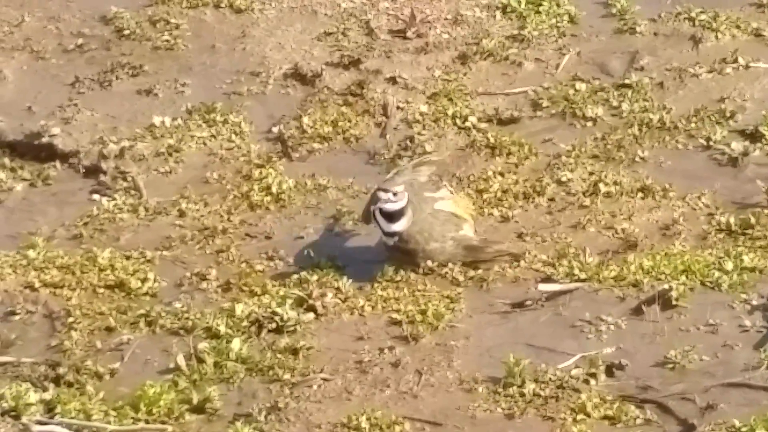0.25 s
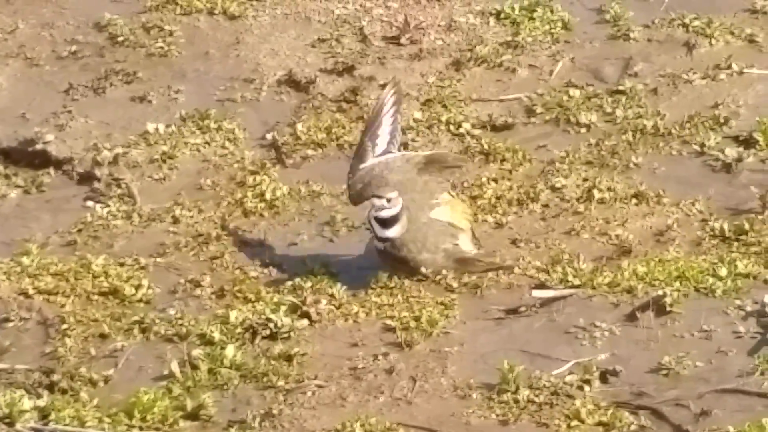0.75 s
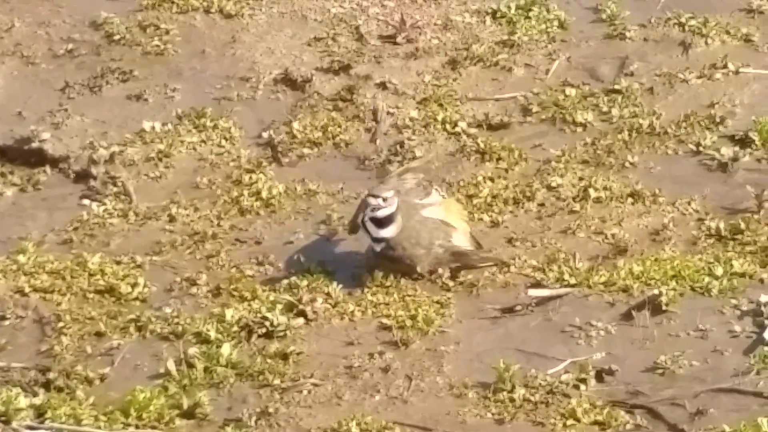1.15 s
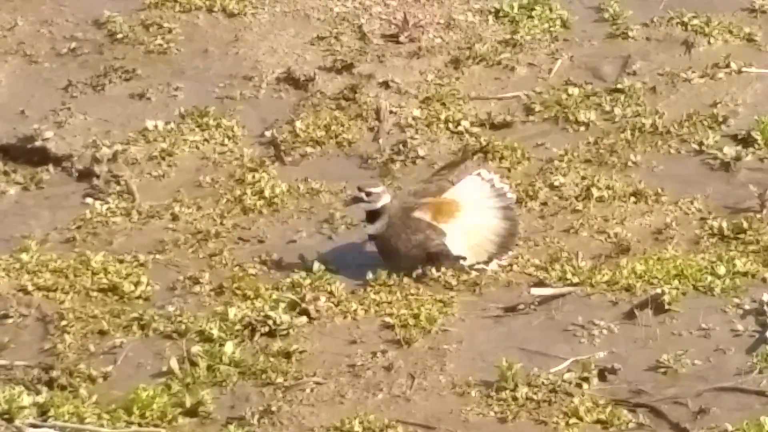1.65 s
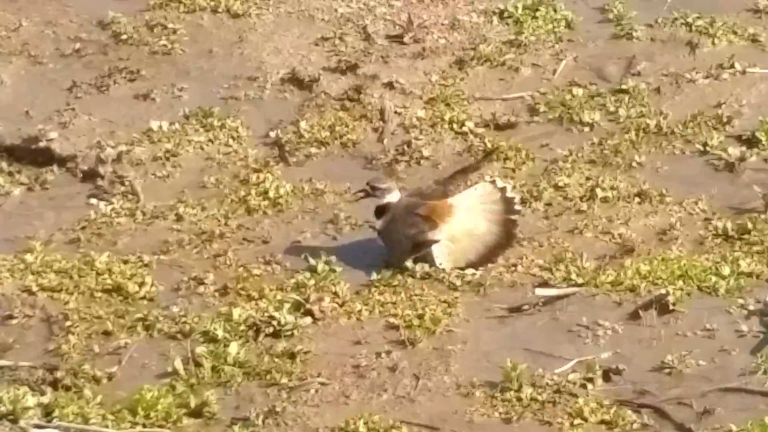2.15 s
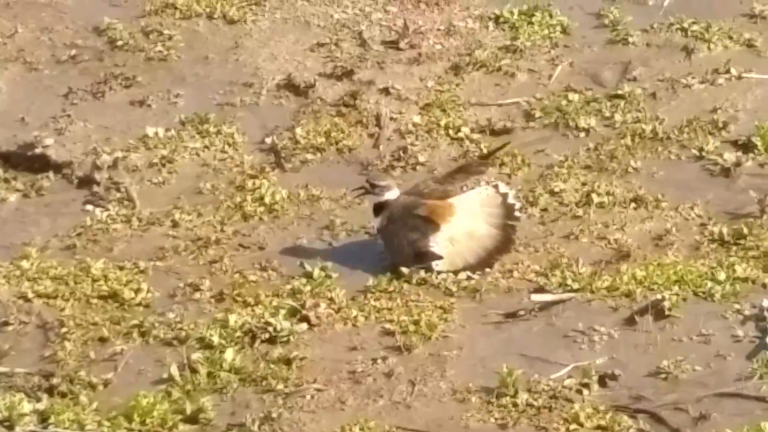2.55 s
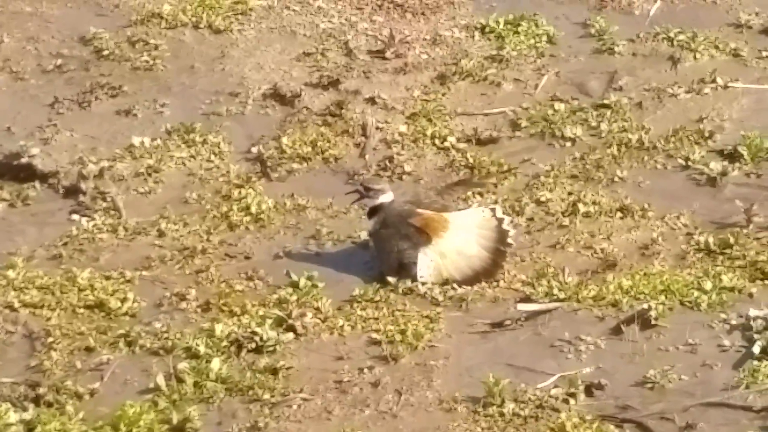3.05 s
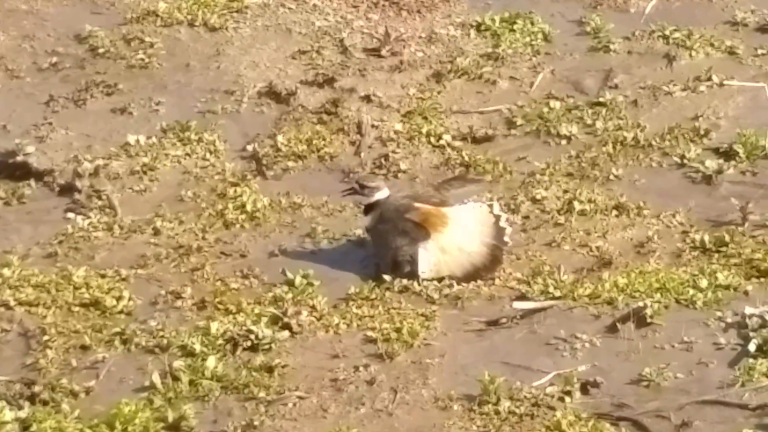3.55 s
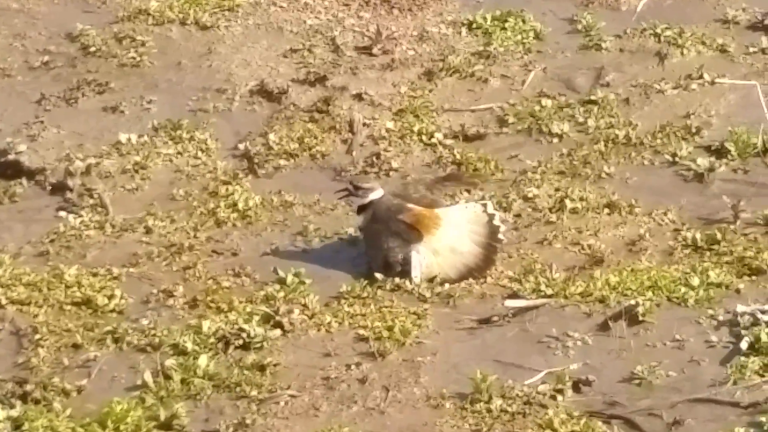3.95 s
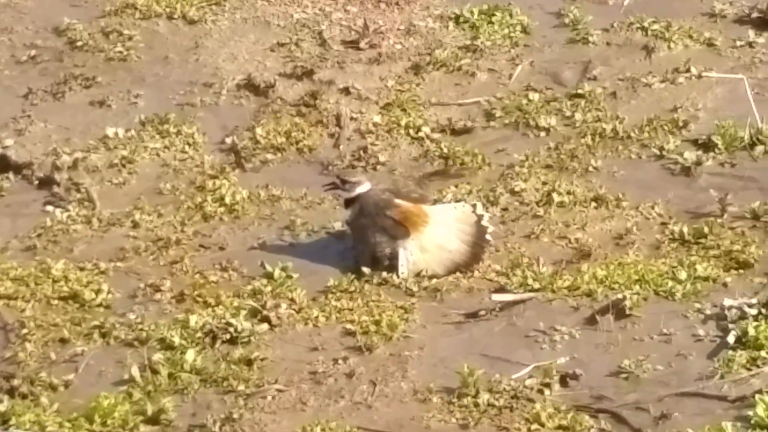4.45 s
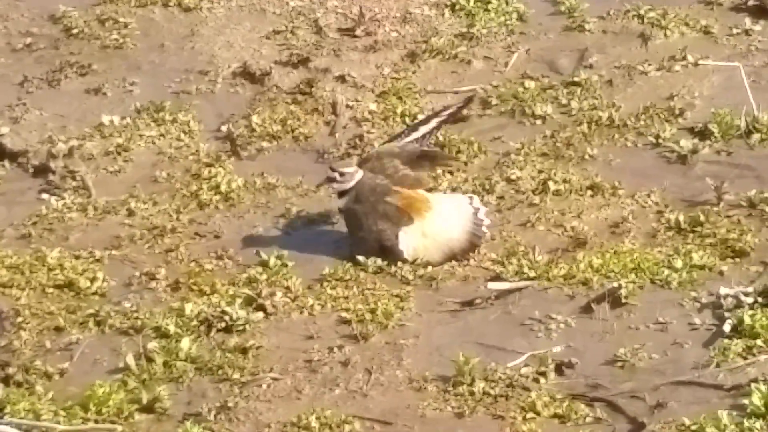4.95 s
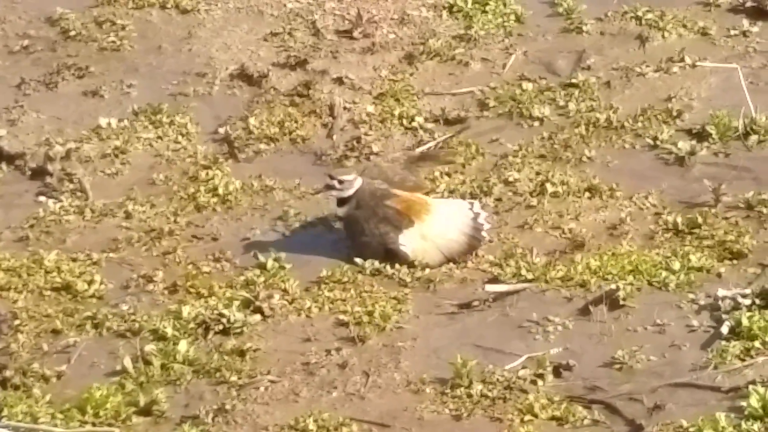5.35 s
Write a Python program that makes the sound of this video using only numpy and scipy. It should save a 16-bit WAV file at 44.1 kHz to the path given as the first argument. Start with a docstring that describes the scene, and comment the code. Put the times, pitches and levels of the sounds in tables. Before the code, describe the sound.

A killdeer gives rising shrill whistles, breaks into a fast, ticking, buzzy trill, then ends on a long upward cry over low wind rumble.

```python
"""Killdeer on a windy mud flat

Rising whistles break into a rapid ticking, hissy trill and end on a long upslur; one faint hoot is far off.
The bird is a sum of partials: a strong second one, joined by odd ones as the period doubles.
The ground adds a short faint tail of scattered echoes; far country air is softly filtered noise.
Wind is shaped noise on two microphone ports, mostly the right one, and freshens towards the end."""
import sys
import numpy as np
from scipy import signal
from scipy.fft import rfft, irfft, next_fast_len
from scipy.io import wavfile
from scipy.ndimage import uniform_filter1d

SR = 44100
rng = np.random.default_rng(int(sys.argv[2]) if len(sys.argv) > 2 else 0)


def bounce(signal):
    """Save signal as a 16-bit WAV file at the path given by the first command-line argument."""
    frames = np.transpose(np.atleast_2d(signal))
    limited = np.clip(frames, -1, 1)
    pcm = np.round(limited * 32767).astype(np.int16)
    wavfile.write(sys.argv[1], SR, pcm)


N = 247401
TIME = np.arange(N) / SR

# Trill notes. Each row: start in seconds, lowest partial's mid-note pitch in Hz, relative level in dB,
# hiss relative to the note in dB.
TRILL_NOTES = [(2.1302, 1962, -26, -47), (2.2167, 1954, -28.5, -45), (2.2862, 1917, -27.5, -42.5),
               (2.3559, 1896, -26, -30), (2.4204, 1925, -26, -41), (2.485, 1895, -26, -38),
               (2.5457, 1944, -26, -33.5), (2.6044, 1915, -25.5, -30.5), (2.66, 1930, -25.5, -33),
               (2.7168, 1954, -24.5, -42), (2.7717, 1944, -26, -28.5), (2.8279, 1893, -23.5, -35),
               (2.8817, 1876, -25, -32), (2.9385, 1849, -25.5, -50.5), (2.9933, 1873, -24.5, -36.5),
               (3.0482, 1888, -25, -29), (3.1022, 1890, -25.5, -26), (3.1549, 1897, -25.5, -23),
               (3.2065, 1910, -24, -28), (3.2589, 1922, -24.5, -25), (3.3114, 1919, -25, -26),
               (3.368, 1928, -25.5, -23), (3.422, 1890, -24, -26.5), (3.4788, 1870, -26, -49.5),
               (3.5293, 1894, -24.5, -42.5), (3.582, 1914, -23.5, -27), (3.638, 1840, -25.5, -45.5),
               (3.6915, 1895, -24.5, -35), (3.745, 1874, -24.5, -27), (3.7946, 1920, -26, -28),
               (3.8514, 1874, -26.5, -38.5), (3.9014, 1907, -25.5, -30), (3.9538, 1900, -23.5, -31),
               (4.0027, 1919, -25, -32), (4.0597, 1902, -26.5, -26), (4.1126, 1930, -26, -30),
               (4.1711, 1850, -26.5, -28), (4.2249, 1864, -29, -33), (4.282, 1835, -28, -40.5),
               (4.338, 1840, -28.5, -35), (4.4107, 1834, -30.5, -43.5), (4.5016, 1871, -33.5, -46)]


def gain_of(db):
    """Decibels to amplitude."""
    return 10 ** (np.asarray(db) / 20)


def evened(x):
    """Scales to rms 1."""
    return x / np.sqrt(np.mean(x ** 2) + 1e-20)


def read(points, hz):
    """Interpolates a spectrum on a log-frequency axis."""
    point_hz, value = np.transpose(points)
    return np.interp(np.log(hz + 1), np.log(point_hz + 1), value)


def coloured(x, points):
    """Filters by a spectrum in dB, with zero phase."""
    size = next_fast_len(x.shape[-1] + 4096)
    gain = gain_of(read(points, np.fft.rfftfreq(size, 1 / SR)))
    return irfft(rfft(x, size) * gain, size)[..., :x.shape[-1]]


def wander(size, rate_hz):
    """Gaussian-lowpassed noise: smooth chance, rms near 1, mostly slower than rate_hz."""
    count = next_fast_len(size + 8192)
    hz = np.fft.rfftfreq(count, 1 / SR)
    spectrum = rfft(rng.standard_normal(count)) * np.exp(-(hz / rate_hz) ** 2)
    return evened(irfft(spectrum, count))[:size]


def noise(points):
    """Noise of rms 1 with the given spectrum."""
    return evened(coloured(rng.standard_normal(N), points))


def add(mix, s, sound):
    """Mixes a sound in at time s."""
    part = mix[max(round(s * SR), 0):][:len(sound)]
    part += sound[:len(part)]


def buffet(db, lumps_db=2.5, lumps_hz=30, crackle_db=6.0, crackle_hz=110, brisk_db=-19, brighten=0.81):
    """Turbulence on one port: the harder it blows, the more of it is small, uneven eddies."""
    # Slow broad turbulence, then small fast eddies. Each row: frequency in Hz, relative density in dB per Hz.
    rumble_colour = [(12, 6), (25, -46), (50, -3.5), (95, 3), (160, -0.5), (250, -9), (400, -31),
                     (800, -29.5), (2000, -91), (5000, -92.5)]
    flutter_colour = [(30, -22.5), (120, -3.5), (280, 4.5), (480, -4), (750, -15.5), (1250, -29),
                      (1800, -34), (3000, -55.5), (8000, -79)]
    fast = np.clip(gain_of(brighten * (db - brisk_db) - 2.0), 0, .92)
    rumble = evened(noise(rumble_colour) * gain_of(lumps_db * wander(N, lumps_hz)))
    flutter = evened(noise(flutter_colour) * gain_of(crackle_db * wander(N, crackle_hz)))
    flow = np.sqrt(1 - fast ** 2) * rumble + fast * flutter
    running_rms = np.sqrt(uniform_filter1d(flow ** 2, size=3000) + 1e-9)
    return gain_of(db) * flow / running_rms


def wind(left_db=-1.5, right_db=-1.0, swell_db=1.5, swell_hz=7):
    """Gusts add power to a breeze that freshens; each port has its own turbulence."""
    # Steady breeze. Each row: time in seconds, left and right relative level in dB.
    breeze = [(0, -47, -33), (.55, -63, -37.5), (1.3, -76, -38.5), (2.2, -68.5, -36), (2.6, -61, -27.5),
              (3, -54, -35.5), (3.3, -53, -34.5), (3.55, -62, -37.5), (3.8, -33, -30.5), (4.05, -40, -34.5),
              (4.22, -60.5, -36), (4.45, -41, -32.5), (4.65, -37.5, -26), (4.85, -22, -23.5),
              (4.95, -27.5, -25), (5.1, -21.5, -23), (5.28, -49, -23.5), (5.6, -18, -22.5)]
    # Gusts. Each row: centre in seconds, width in seconds, left and right relative level in dB.
    gusts = [(.1, 0.0245, -44, -38), (.82, 0.072, -44, -33.5), (1.74, 0.052, -28.5, -54),
             (1.901, 0.11, -44, -28), (3.1, 0.034, -48, -28.5), (3.35, 0.017, -30.5, -27),
             (3.898, 0.019, -25.5, -38.5), (4.07, 0.053, -43, -31), (5.17, 0.088, -25, -21),
             (5.38, 0.051, -20.5, -21.5)]
    s, *ports = np.transpose(breeze)
    breeze_db = [np.interp(TIME, s, db) + swell_db * wander(N, swell_hz) for db in ports]
    power = gain_of(breeze_db) ** 2
    for at, width, *db in gusts:
        bell = np.exp(-np.minimum(((TIME - at) / width) ** 2, 30))
        power = power + gain_of(db)[:, None] ** 2 * bell
    left, right = 10 * np.log10(power)
    return np.array([buffet(left + left_db), buffet(right + right_db)])


def air(shared=0.089):
    """Distant air: a soft filtered-noise hiss, partly the same at both ports."""
    # Each row: frequency in Hz, relative density in dB per Hz.
    air_colour = [(20, 12.5), (100, 15.5), (330, 6), (850, 0), (1900, -8), (2600, -12), (4000, -22),
                  (5500, -24.5), (8000, -32.5), (10000, -30.5), (13000, -25.5), (16000, -30)]
    # Level before a slow drift. Each row: time in seconds, level in dB.
    air_level = [(0, -49.5), (1.3, -47), (2.5, -48.5), (4, -48.5), (5.6, -47)]
    same = np.clip(shared, 0, 1)
    separate = np.array([noise(air_colour), noise(air_colour)])
    hiss = np.sqrt(same) * noise(air_colour) + np.sqrt(1 - same) * separate
    return hiss * gain_of(np.interp(TIME, *np.transpose(air_level)) + 0.9 * wander(N, 2.6))


def eddies(level_db=-0.95, left_db=-24, weak_db=-30, weak_width_s=0.012, count=8):
    """Single eddies swell and pass the right port within hundredths of a second; weak ones come at random."""
    # Strongest eddies. Each row: centre in seconds, width in seconds, relative level in dB.
    strong = [(.104, 0.0069, -24), (1.173, 0.0083, -28), (1.336, 0.0088, -23), (1.411, 0.00387, -20),
              (1.506, 0.011, -20.5), (1.766, 0.0087, -24), (1.886, 0.01376, -16), (1.917, 0.019, -18.5),
              (1.99, 0.009, -21.5), (2.188, 0.0077, -14), (2.202, 0.0038, -11.5), (2.24, 0.022, -21),
              (2.547, 0.0098, -13), (2.594, 0.0035, -16.5), (2.618, 0.0089, -19), (2.7, 0.0074, -18),
              (2.755, 0.011, -15.5), (3.261, 0.0035, -21), (3.353, 0.0202, -22), (3.8, 0.008, -20),
              (3.834, 0.022, -21.5), (4.515, 0.0076, -21), (4.713, 0.014, -18), (4.932, 0.0067, -19.5),
              (5.175, 0.0018, -10), (5.197, .0045, -12.5)]
    # Spectrum of one eddy. Each row: multiple of its upper reach, relative density in dB per Hz.
    eddy_colour = [(.05, -21), (.25, -0.5), (.6, -2), (1, -6.5), (1.7, -15), (3, -38.5), (7, -63),
                   (20, -89)]
    # upper reach of an eddy of this width and level; shorter and stronger ones reach higher
    usual_reach_hz, usual_width_s, usual_db = 278, 0.012, -18
    width_power, growth_per_db = 0.05, 0.0968
    t, out = np.arange(-4096, 4096) / SR, np.zeros(N)
    weak = [(s, weak_width_s, weak_db) for s in rng.uniform(-t[0], N / SR, count)]
    for s, width, db in strong + weak:
        reach_hz = usual_reach_hz * (usual_width_s / width) ** width_power
        reach_hz *= np.exp(growth_per_db * (db - usual_db))
        window = np.exp(-np.minimum((t / width) ** 2, 30))
        colour = [(k * reach_hz, d) for k, d in eddy_colour]
        puff = coloured(rng.standard_normal(len(t)) * window, colour)
        puff *= np.sqrt(np.sum(window ** 2) / np.sum(puff ** 2))
        add(out, s + t[0], gain_of(db + level_db) * puff)
    return np.array([gain_of(left_db) * out, out])


def syrinx(t, hz, db, lowest_db, odd_db, bright_db, rasp, snap_hz, odd_delay_s, jitter, snap_s=0.00077,
           slip=0.97, slip_hz=380, odd_flicker_db=2.59, attack_s=0.0012, release_s=0.0096):
    """The second partial starts with a snap; a moment later the period doubles and the odd partials join."""
    # Weaker odd partials, relative to the second. Each row: frequency in Hz, relative level in dB.
    odd_colour = [(1900, -14), (5500, -14), (5950, -21.5), (8800, -21.5), (9300, -19.5), (9900, -40),
                  (12500, -33.5), (13300, -29), (15000, -35.5)]
    # Even partials. Each row: frequency in Hz, relative level in dB.
    even_colour = [(3400, -1), (4400, 1.5), (7100, -21), (8000, -15), (11000, -42), (12100, -27.5),
                   (14500, -30.5), (15600, -39)]
    hz = (hz + snap_hz * np.exp(-t / snap_s)) * (1 + jitter * wander(len(t), 970))
    phase = 2 * np.pi * np.cumsum(hz) / SR
    onset = (1 + np.tanh((t - odd_delay_s) / 0.00033)) / 2
    doubling = gain_of(odd_flicker_db * wander(len(t), 170)) * onset
    slipping = slip * rasp * wander(len(t), slip_hz)  # unsteady doubling smears the upper odd partials
    tone = gain_of(read(even_colour, 2 * hz)) * np.sin(2 * phase)
    tone += doubling * gain_of(read(odd_colour, hz) + lowest_db) * np.sin(phase)
    for k in (3, 5, 7):
        tone += doubling * gain_of(read(odd_colour, k * hz) + odd_db) * np.sin(k * phase + slipping)
    for k in (4, 6, 8):
        partial_db = read(even_colour, k * hz) + bright_db * (k / 2 - 1) ** 0.7
        tone += gain_of(partial_db) * np.sin(k * phase)
    ramps = np.clip(t / attack_s, 0, 1) * np.clip((t[-1] - t) / release_s, 0, 1)
    gate = np.sin(np.pi / 2 * ramps) ** 2
    return np.sqrt(2) * gain_of(db) * gate * tone


def whistles(level_db=-0.73, odd_delay_s=.008, attack_s=0.0012):
    """Notes step, glide to a goal, mostly upwards, and sag; raspy until the doubling settles."""
    # Drawn-out calls. Each row: start in seconds, length in seconds, first pitch in Hz, early step in Hz,
    # goal pitch in Hz, share of the length at the goal, lateness of the glide (exponent), relative level in dB,
    # swell in dB, lowest partial, upper odd partials and brightness in relative dB, relative rasp,
    # settling time in seconds. Pitches are of the lowest partial.
    calls = [(0.571, 0.16, 1864, 37, 1965, 0.79, 1.3, -31, 4.5, -4, 6, 3, 0.66, 0.085),
             (0.867, 0.12, 1809, 10, 1963, 0.65, 1.76, -29, 8, -4, 2.5, 2, 0.44, 0.044),
             (1.078, 0.12, 1900, 6, 2050, 1, 0.8, -32, -5, 0.5, 8.5, 7.5, .45, 0.035),
             (1.290, 0.14, 1882, 27.5, 2065, .88, 2.27, -27, 2, -5, 4, 7, .35, .02),
             (1.538, 0.1182, 1910, 42.5, 2111, 0.8, 4.7, -29.5, 0.5, 2, 5, 9.5, 0.27, 0.055),
             (1.751, 0.056, 1912, -30, 1842, 0.53, 1.62, -34.5, -7.5, -12, -13, 0, 0.5, 0.033),
             (1.871, 0.0509, 1862, 21.5, 1963, 0.6, 1.6, -27.5, 1, -3, 0, 2.5, 0.67, .008),
             (2.012, 0.052, 1770, 26, 1906, 0.69, 0.63, -26.5, 8.5, 2.5, 0.5, 0.5, .1, 0.011),
             (4.657, 0.057, 1940, 0, 1756, 0.79, 2.6, -27.5, 7.5, 0.5, 2, -5.5, 0.3, 0.016),
             (4.899, 0.22, 1809, 49, 2058, .88, 7.2, -22.5, 12.5, 1, -0.5, 0, .15, 0.025)]
    step_share, step_s = .3, 0.0047  # early in a call the pitch steps quickly
    sag_hz_per_s, fade_db_per_s = 910, 74  # once the goal is passed
    soft_start_db, soft_start_s = 8.5, .008
    quaver, waver_db = .0025, .8  # unsteadiness: share of the pitch, level
    odd_rise_db, settle_sharpness = 11.5, 4.5  # period doubling starts weak, then locks in
    odd_growth_db, brighten_db = 4.5, 6  # upper odd and top partials grow towards the goal
    out = np.zeros(N)
    for (s, length, first_hz, step_hz, goal_hz, goal, late, db, swell_db,
         lowest_db, odd_db, bright_db, rasp, settle_s) in calls:
        t = np.arange(0, length, 1 / SR)
        share = np.minimum(t / (goal * length), 1)
        past_s = np.maximum(t - goal * length, 0)
        glide = share ** late
        step = (1 + np.tanh((t - step_share * length) / step_s)) / 2
        hz = first_hz + step_hz * step + (goal_hz - first_hz - step_hz) * glide - sag_hz_per_s * past_s
        effort_db = db + level_db - swell_db * (1 - share ** (late ** 0.49)) - fade_db_per_s * past_s
        effort_db = effort_db + waver_db * wander(len(t), 40) - soft_start_db * np.exp(-t / soft_start_s)
        unsettled = np.exp(-(t / settle_s) ** settle_sharpness)
        weak_db = odd_rise_db * unsettled
        note = syrinx(t, hz * (1 + quaver * wander(len(t), 55)), effort_db, lowest_db - weak_db,
                      odd_db - weak_db - odd_growth_db * (1 - share), bright_db - brighten_db * (1 - glide),
                      rasp * (.2 + unsettled), snap_hz=70, odd_delay_s=odd_delay_s, jitter=0.00091,
                      attack_s=attack_s)
        add(out, s, note)
    return out


def beamed(x, split_hz=10500):
    """The bill turns to and from the microphone; only the shortest waves follow its direction."""
    # Gain of the top band. Each row: time in seconds, gain in dB.
    aim = [(.6, -0.5), (1.35, -1), (1.65, -6.5), (1.8, -12.5), (2.4, 1.5), (2.8, 1.5), (3.3, 6), (4.3, 8),
           (4.6, 1), (5.1, -1)]
    highpass = signal.butter(4, split_hz, "high", fs=SR, output="sos")
    top = signal.sosfiltfilt(highpass, x)
    return x + top * (gain_of(np.interp(TIME, *np.transpose(aim))) - 1)


def ground(x, near_db=-19, near_t60=0.066, far_db=-26, far_t60=0.24, first_s=0.00275):
    """Clods and weeds scatter a quick burst of echoes, the farther flat a faint tail."""
    # Colour of the scattered sound. Each row: frequency in Hz, relative level in dB.
    scatter = [(1900, 4), (4000, 5), (6000, -2.5), (8000, -12), (15000, -9)]
    t = np.arange(SR // 2) / SR
    sparse = rng.random(len(t)) < 3000 / SR  # about 3000 echoes per second
    taps = rng.choice([-1., 1.], len(t)) * sparse * (t > first_s)
    near, far = taps * gain_of(-60 * t / near_t60), taps * gain_of(-60 * t / far_t60)
    echoes = gain_of(near_db) * near / np.linalg.norm(near) + gain_of(far_db) * far / np.linalg.norm(far)
    return signal.fftconvolve(coloured(x, scatter), echoes)[:N]


def hoot():
    """One faint arched sine from far across the flat."""
    # Each row: time in seconds, pitch in Hz, level in dB.
    course = [(1.27, 1003, -77.5), (1.3, 1026, -62.5), (1.335, 1033, -57.5), (1.365, 1014, -56),
              (1.4, 940, -62.5)]
    s, hz, db = np.transpose(course)
    level = gain_of(np.interp(TIME, s, db)) * (TIME > s[0]) * (TIME < s[-1])
    return level * np.sin(2 * np.pi * np.cumsum(np.interp(TIME, s, hz)) / SR)


def ticks(level_db=-51, lead_s=0.00828, width_s=.002):
    """A faint bell-shaped puff of noise just before each trill note."""
    # Each row: frequency in Hz, relative density in dB per Hz.
    tick_colour = [(500, -23), (1500, 3), (4500, -1), (6000, -13.5), (8000, -23), (16000, -26.5)]
    t, level = np.arange(0, 6 * width_s, 1 / SR), np.zeros(N)
    middle_s = t[-1] / 2
    for s, *_ in TRILL_NOTES:
        add(level, s - lead_s - middle_s, np.exp(-((t - middle_s) / width_s) ** 2))
    return gain_of(level_db) * level * noise(tick_colour)


def trill(level_db=0.0, overhang_s=0.0053, breathy_db=5.0, sputter_db=-0.5, lowest_db=0.1,
          fall_scatter=0.051, bright_scatter_db=0.5, waver_db=1.3):
    """Short hissy notes, each sliding down as the puff that drives it fades; longer ones arch first."""
    # Air rushing through the open bill. Each row: frequency in Hz, relative density in dB per Hz.
    bill_hiss = [(1500, -27.5), (3000, -7.5), (4400, 5.5), (5600, 19.5), (6700, -7), (8000, 1), (9200, 2),
                 (10500, -17), (12500, -3), (14500, -12), (16000, -27.5)]
    # Course of a note. Each row: share of its length, then level, odd partials and brightness in relative dB.
    note_shape = [(0, -4, -17, -2.5), (.2, 0.5, 3, -3), (.45, 2, 0, -3), (.75, 0, 1, -5),
                  (1.05, -6.5, 3.5, 6)]
    # The trill tightens, dulls and relaxes. Each row: time in seconds, note length in seconds before overhang,
    # nominal fall in Hz, odd partials and brightness in relative dB.
    trill_course = [(2.124, 0.03154, 210, -1.5, 1.5), (2.227, 0.023, 213, 2, 0.5),
                    (2.35, 0.024, 242, -4, -3), (2.473, 0.028, 302, -3, -3.5), (2.68, 0.021, 238, -3, -3.5),
                    (3.1, .023, 310, -7, -7.5), (3.41, 0.018, 235, -8, -7), (3.602, .0195, 207, -6, -8.5),
                    (4.013, .02, 239, -5.5, -6), (4.204, 0.019, 155, -4.5, -5.5),
                    (4.349, 0.02115, 147, -2, -5.5), (4.503, 0.035, 75, 2, 1)]
    usual_snap_hz, snap_scatter = 400, 0.3  # a note drops in from above, by a varying amount
    out = np.zeros(N)
    rush = evened(noise(bill_hiss) * gain_of(sputter_db * wander(N, 500)))
    stage, *courses = np.transpose(note_shape)
    when, *trends = np.transpose(trill_course)
    chance = rng.uniform(-1, 1, (len(TRILL_NOTES), 4))
    for (s, hz, db, hiss_db), (steeper, brighter, curved, sharper) in zip(TRILL_NOTES, chance):
        length, fall_hz, odd_db, bright_db = (np.interp(s, when, c) for c in trends)
        t = np.arange(0, length + overhang_s, 1 / SR)
        share = t / length
        swell_db, doubling_db, edge_db = (np.interp(share, stage, c) for c in courses)
        bend = (length / .025) ** 3 * (1 + .3 * curved)
        slide = share - .5 + bend * np.minimum(share - .5, 0) ** 2
        pitch_hz = hz - fall_hz * (1 + fall_scatter * steeper) * slide
        doubled_db = odd_db + doubling_db
        tone = syrinx(t, pitch_hz, db + level_db + swell_db + waver_db * wander(len(t), 150),
                      doubled_db + lowest_db, doubled_db, bright_db + edge_db + bright_scatter_db * brighter,
                      rasp=0.2, snap_hz=usual_snap_hz * (1 + snap_scatter * sharper),
                      odd_delay_s=0.00484, jitter=0.00318, attack_s=.0012)
        hiss = rush[round(s * SR):][:len(t)] * signal.windows.tukey(len(t), .3) * gain_of(1.4 * swell_db)
        add(out, s, tone + gain_of(db + hiss_db + breathy_db) * hiss)
    return out


def bird(right_echo_db=-5):
    """The left port hears the bird plainly; the right is shaded and shifted in phase, mostly ahead."""
    # Phase lead of the right port. Each row: frequency in Hz, lead in radians.
    right_lead = [(1900, -.25), (3700, -.4), (3950, 1.0), (5400, 1.6), (6000, 2.4), (7200, 2.0),
                  (7800, 1.0), (9400, 2.0), (11500, 1.0), (13300, 1.5), (15500, .9)]
    # Direct sound at the right port against the left. Each row: frequency in Hz, gain in dB.
    right_shade = [(1900, -5), (3550, -15.5), (3800, -26), (4150, -9), (5400, -10), (6100, -2), (7300, 4.5),
                   (8000, -14), (9300, -10), (11500, -2), (13000, -6.5), (15500, -1.5)]
    voice = beamed(whistles() + trill() + ticks())
    size = next_fast_len(N + 4096)
    lead = np.exp(1j * read(right_lead, np.fft.rfftfreq(size, 1 / SR)))
    right = coloured(irfft(rfft(voice, size) * lead, size)[:N], right_shade)
    # each port gets its own echoes
    return np.array([voice + ground(voice), right + gain_of(right_echo_db) * ground(voice)])


def scene():
    """Bird, wind and the far surroundings."""
    return bird() + wind() + eddies() + air() + hoot()


def record(dry):
    """Band limit: a linear-phase low-pass at 15.9 kHz."""
    lowpass = signal.firwin(511, 15900, window=("kaiser", 9), fs=SR)
    return signal.oaconvolve(dry, lowpass[None], "same")


dry = scene()
out = record(dry)
bounce(out)
```